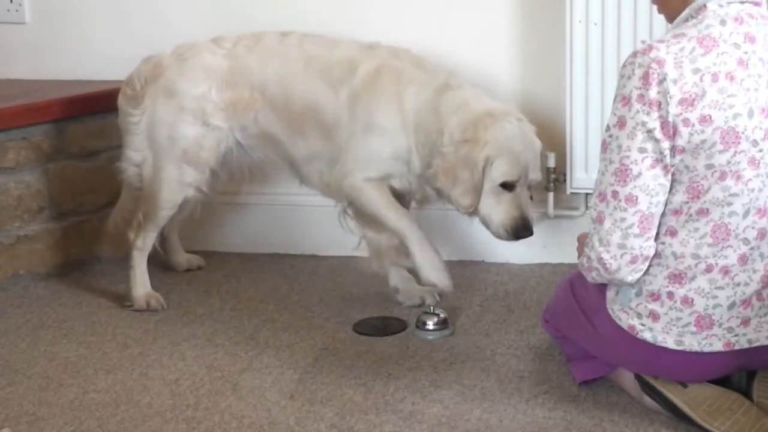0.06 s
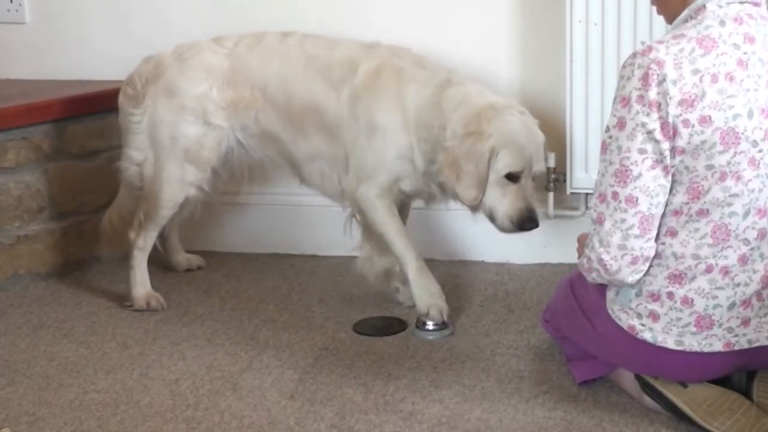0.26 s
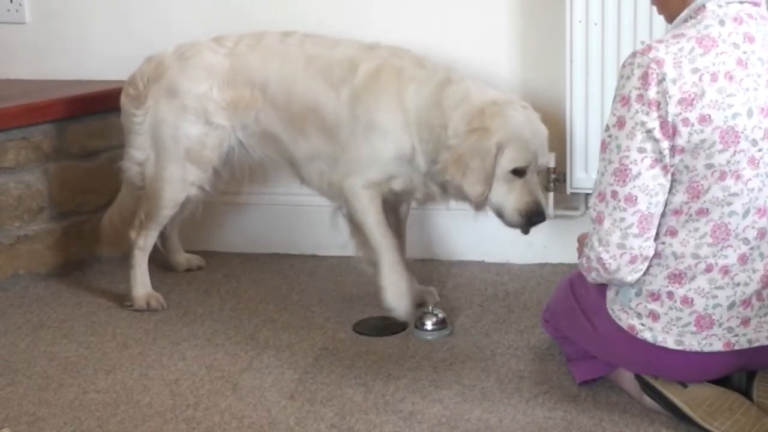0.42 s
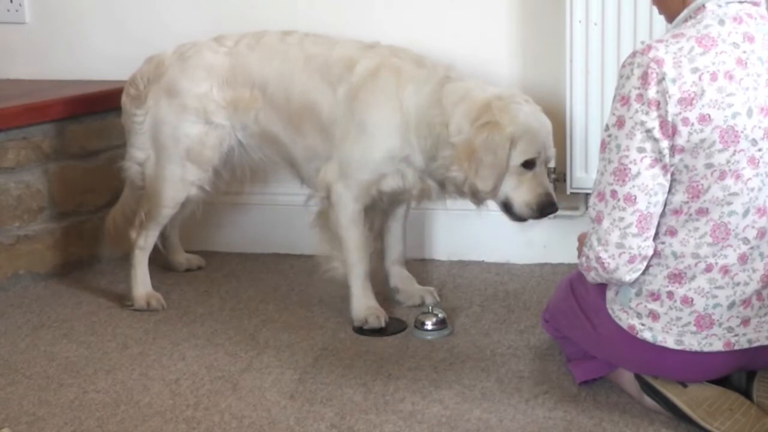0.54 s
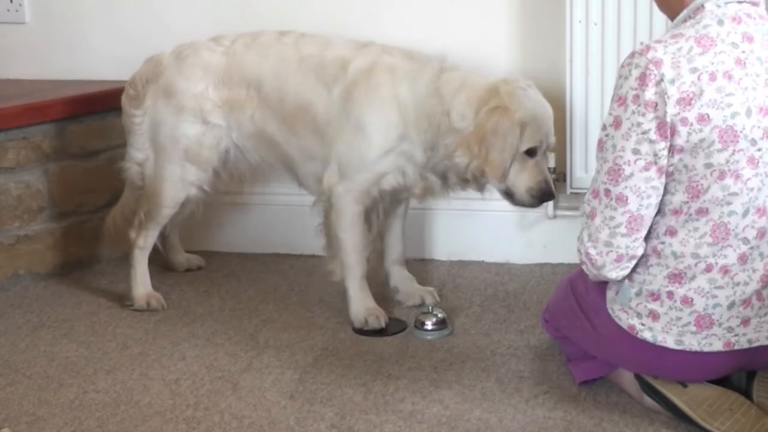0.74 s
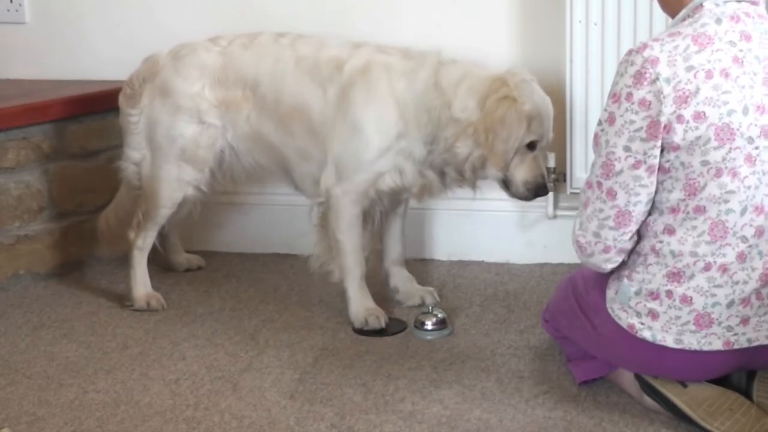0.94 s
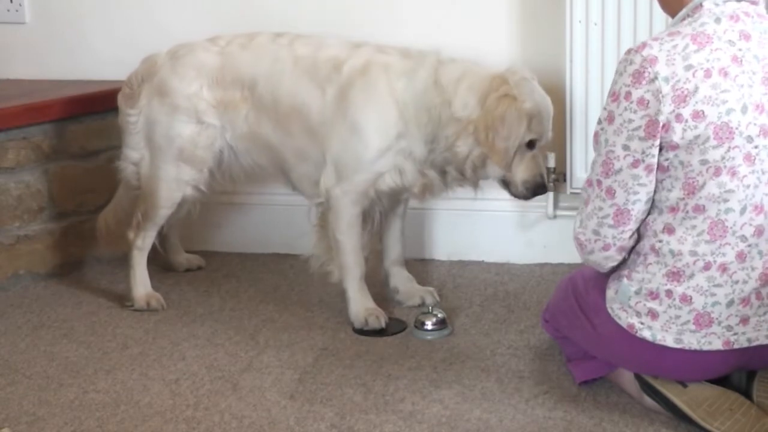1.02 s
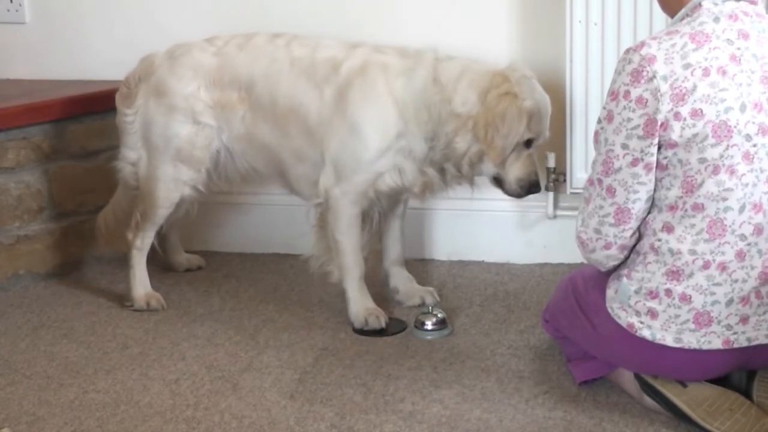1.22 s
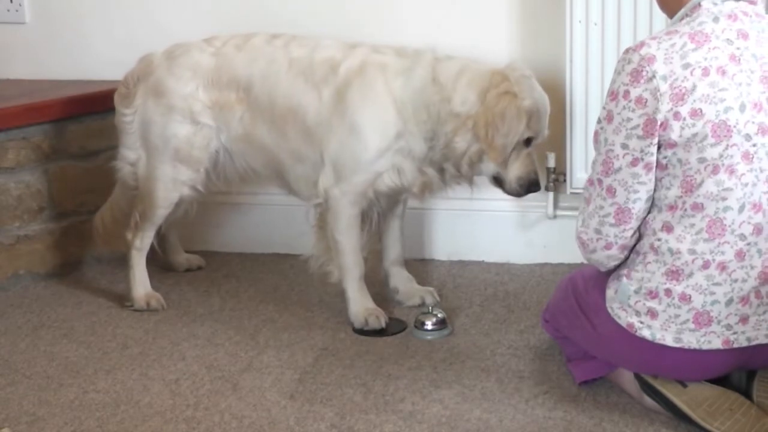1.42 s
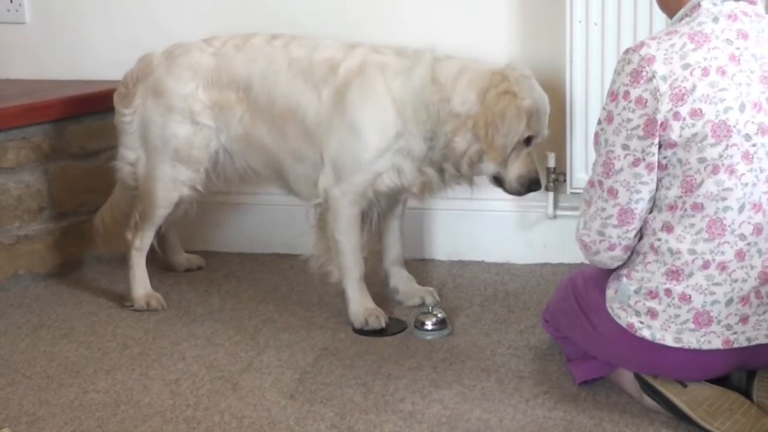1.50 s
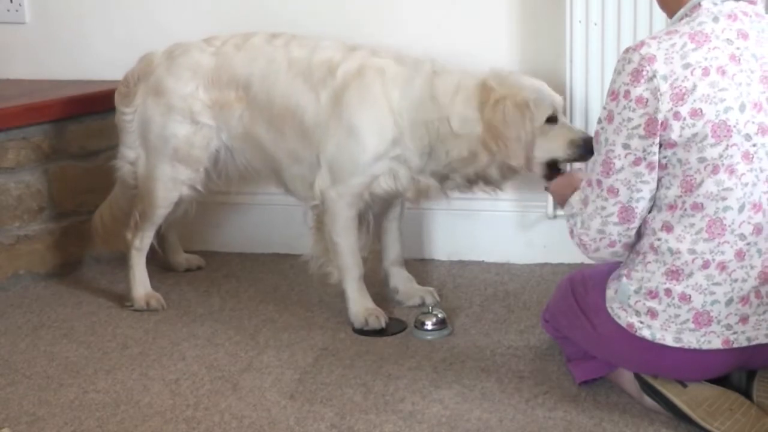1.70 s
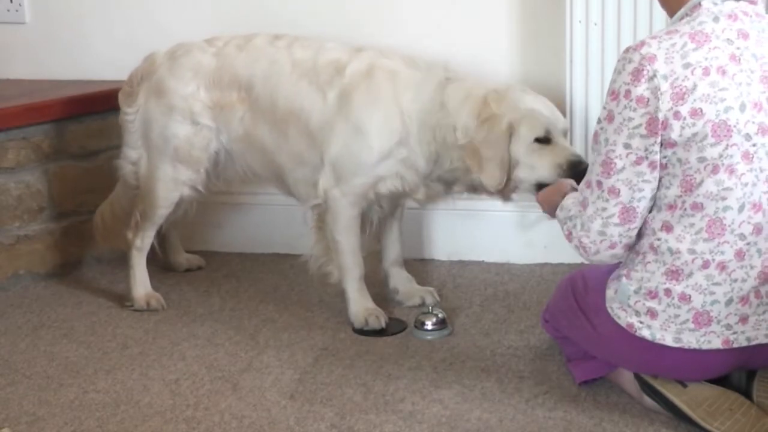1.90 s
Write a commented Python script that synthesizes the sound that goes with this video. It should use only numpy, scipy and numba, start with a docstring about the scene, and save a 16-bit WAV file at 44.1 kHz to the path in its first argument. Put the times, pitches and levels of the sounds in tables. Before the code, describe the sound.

A small desk bell dings once and rings on, with two sharp clicker snaps.

```python
"""A low hum fills a carpeted room, where a steel desk bell still sings faintly from an earlier strike.
A dog scuffs, whines and paws the plunger: a double knock, then the dome rings in beating pairs of modes.
A training clicker answers, its steel tongue snapping once when pressed and again when let go.
As the ring fades, the dog shifts its paws and whines twice more, very faintly.
Throughout, a limiter ducks the ring at the sharpest hits."""
import sys
import numpy as np
from scipy import signal
from scipy.fft import rfft, irfft
from scipy.io import wavfile
from scipy.ndimage import minimum_filter1d
from numba import njit

SR = 44100
rng = np.random.default_rng(int(sys.argv[2]) if len(sys.argv) > 2 else 0)


def log_audio(samples):
    """Write samples as a 16-bit WAV file to the path given in sys.argv[1]."""
    # one column per channel
    frames = np.atleast_2d(samples).T
    # limit to full scale, then quantise
    limited = np.clip(frames, -1, 1)
    pcm = np.round(limited * 32767).astype(np.int16)
    wavfile.write(sys.argv[1], SR, pcm)


N = 85995

# Room tone colour: frequency_hz, relative_db
AIR_COLOUR = [(25, 0.5), (45, -11), (70, 3.5), (110, -4.5), (150, -4), (300, -10.5), (600, -7.5),
              (1000, -11.5), (1800, -15), (2500, -29.5), (4500, -26.5), (7000, -28), (12000, -32),
              (16000, -37.5)]
# The dog's whines: start_s, length_s, start_pitch_hz, end_pitch_hz, level_db
DOG_WHINES = [(0.084, .16, 595, 535, -61), (0.94, .24, 649, 652, -64), (1.471, 0.24, 618, 541, -60)]
# Paws on carpet: centre_s, spread_s, centre_hz, width_hz, level_db
PAW_SCUFFS = [(0.051, 0.017, 704, 756, -56), (0.141, .006, 4250, 1577, -59), (0.932, .03, 1266, 250, -61.5),
              (0.933, 0.021, 490, 200, -59.5), (.935, .022, 6900, 7000, -62),
              (1.631, 0.019, 750, 1190, -60), (1.62, 0.017, 4220, 2200, -71),
              (1.778, 0.014, 3860, 1490, -64.5), (1.768, 0.01, 10600, 4000, -69)]
# Low body under each snap and knock: frequency_hz, relative_db
BODY_COLOUR = [(30, -11.5), (120, 12.5), (300, -23.5), (600, 9), (1300, -3.5), (3000, -39), (16000, -40.5)]
# Clicker press, then release: snap_s, level_db, build_s, t60_s, thud_db, pan_db
CLICKER_SNAPS = [(.4801, -12, .0019, .007, -17.5, -1), (.6913, -14.3, .0022, .007, -22, -1)]
# The steel tongue going down: frequency_hz, relative_db
PRESS_COLOUR = [(300, -24), (1100, -24), (1900, -7.5), (2700, -20.5), (4500, -7.5), (5700, -4.5),
                (7000, 5.5), (8500, -3), (10000, -12), (12000, -7.5), (13200, -24.5), (16000, -15.5)]
# The steel tongue springing back: frequency_hz, relative_db
RELEASE_COLOUR = [(300, -30), (1500, -29), (1830, -6), (2500, -19), (3700, -21), (4600, -1.5), (6800, 2.5),
                  (8200, -4.5), (9500, -1), (10300, -1), (11000, 4.5), (11600, -4), (12400, -2.5),
                  (13300, -15.5), (16000, -20)]
# Plunger and clapper hits: start_s, level_db, thud_db
BELL_KNOCKS = [(.2288, -18.5, -30), (.2315, -9.5, -19)]
# Metallic edge of those hits: frequency_hz, relative_db
METAL_COLOUR = [(300, -12), (900, -4), (1500, -3.5), (2400, -14.5), (3500, -5.5), (4500, -11), (7000, -11),
                (9000, -5), (9800, 3), (10600, -8.5), (11400, 5.5), (12300, -4), (13200, 5), (14200, -15.5),
                (16000, -11)]
# The dome's mode pairs: pitch_hz, relative_db, t60_s, pan_db, left_lead_s,
# twin_offset_hz, twin_relative_db, twin_pan_db, swell_s
DOME_MODES = [(900, -33.8, 8.2, 2.2, 7e-5, -9.95, -13, 1.4, 0),
              (2369.8, -36.8, 4.4, 3, 1e-5, -13.75, -9.5, -3, .19),
              (4369.6, -33, 4.3, -.4, 0, -4.8, -9.5, -2, .09),
              (6855.4, -23.2, 1.92, -.7, -9e-6, 15.3, -10, -7, .14), (8181, -27.5, .27, 0, 0, 6, -12, 0, 0),
              (9813, -19.5, .62, -8, 1.2e-5, 13, -14, 0, 0), (11402, -22, .23, -5, 1.5e-5, 50, -6, -3, 0),
              (13174, -20, .34, -2, 1.8e-5, 13, -6, 4, 0)]
# The dome's weak single overtones: pitch_hz, relative_db, t60_s
DOME_OVERTONES = [(1798, -61, 7), (3763, -47, .3)]

ROOM_T60_S, ROOM_GAP_S, ROOM_BUILD_S = .35, .0016, .003
AIR_DB, AIR_SIDE_DB, HUM_HZ, HUM_DB = -60, -5.5, 114, -62
CASE_DB, CASE_T60_S = -4.5, .098
EARLIER_STRIKE_S, STRIKE_S, BELL_DB = -3.5, .2314, .65
SWELL_START = .3  # share of full amplitude at which a swelling mode starts
DIP_HZ, DIP_WIDTH_HZ, DIP_DB, HIGH_CUT_HZ = 3147, 361, -12.5, 15900
LIMIT_DB, LIMIT_ATTACK_S, LIMIT_RELEASE_S = -8.8, .0004, .075


def undb(db):
    """Decibels to gain."""
    return 10 ** (np.asarray(db) / 20)


def since(start_s):
    """Seconds since a moment, negative before it."""
    return np.arange(N) / SR - start_s


def pan(db):
    """Left and right gains, db apart; positive leans left."""
    return undb(np.array([[db], [-db]]) / 2)


def fade(t, t60_s):
    """Hard attack, then a decay of 60 dB every t60_s."""
    return (t >= 0) * np.exp(-np.log(1000) * np.maximum(t, 0) / t60_s)


def noise(colour):
    """Unit-level noise shaped by a colour table."""
    hz, db = np.array(colour).T
    f = np.maximum(np.fft.rfftfreq(N, 1 / SR), 1)
    gain = undb(np.interp(np.log(f), np.log(hz), db))
    x = irfft(rfft(rng.standard_normal(N)) * gain, N)
    return x / x.std()


def in_room(x, wet_db):
    """A sound plus its diffuse reflections, different at each ear."""
    t = since(ROOM_GAP_S)[:SR // 2]
    build = 1 - np.exp(-np.maximum(t, 0) / ROOM_BUILD_S)
    tail = rng.standard_normal((2, len(t))) * fade(t, ROOM_T60_S) * build
    tail /= np.sqrt(np.sum(tail ** 2, axis=1, keepdims=True))
    return x + undb(wet_db) * signal.fftconvolve(np.atleast_2d(x), tail, axes=1)[:, :N]


def room_tone():
    """A wide bed of steady air with a wavering low hum."""
    rush = noise(AIR_COLOUR) + undb(AIR_SIDE_DB) * noise(AIR_COLOUR) * np.array([[1], [-1]])
    drift = np.interp(np.arange(N), np.linspace(0, N, 20), rng.standard_normal(20))
    hum = np.sin(2 * np.pi * np.cumsum(HUM_HZ * (1 + .016 * drift)) / SR)
    return pan(db=2) * (undb(AIR_DB) * rush + undb(HUM_DB) * hum)


def whines():
    """The dog's thin, pure tones sag in pitch or hold nearly level."""
    out = 0
    for start_s, length_s, start_hz, end_hz, db in DOG_WHINES:
        progress = np.clip(since(start_s) / length_s, 0, 1)
        arch = np.sqrt(4 * progress * (1 - progress))
        pitch_hz = start_hz + (end_hz - start_hz) * progress
        out = out + undb(db) * arch * np.sin(2 * np.pi * np.cumsum(pitch_hz) / SR)
    return in_room(out, wet_db=-5.5)


def paws():
    """Paws rub the carpet in brief, soft swells of band noise."""
    out, f = 0, np.fft.rfftfreq(N, 1 / SR)
    for centre_s, spread_s, hz, width_hz, db in PAW_SCUFFS:
        rub = irfft(rfft(rng.standard_normal(N)) / (1 + (2 * (f - hz) / width_hz) ** 2), N)
        swell = np.exp(-.5 * (since(centre_s) / spread_s) ** 2)
        out = out + undb(db) * rub / rub.std() * swell
    return in_room(out, wet_db=0)


def thud(start_s, db):
    """The dull push of a small body that is knocked."""
    push = fade(since(start_s), t60_s=.005) * noise(BODY_COLOUR)
    return undb(db) * in_room(push, wet_db=-10)


def clicker():
    """A steel tongue buckles over a few milliseconds and snaps through; its case rings briefly."""
    out = 0
    for row, colour in zip(CLICKER_SNAPS, (PRESS_COLOUR, RELEASE_COLOUR)):
        snap_s, db, build_s, t60_s, thud_db, pan_db = row
        t = since(snap_s)
        buckle = (t < 0) * np.exp(-.5 * (t / build_s) ** 2)
        case = undb(CASE_DB) * fade(t, CASE_T60_S)
        snap = in_room((buckle + fade(t, t60_s) + case) * noise(colour), wet_db=-2)
        out = out + pan(pan_db) * undb(db) * snap + thud(snap_s, thud_db)
    return out


def plunger():
    """The bell's attack: the plunger bottoms out and the clapper meets the dome."""
    out = 0
    for start_s, db, thud_db in BELL_KNOCKS:
        knock = in_room(fade(since(start_s), t60_s=.018) * noise(METAL_COLOUR), wet_db=-7)
        out = out + pan(db=-3) * undb(db) * knock + thud(start_s, thud_db)
    return out


def mode(t, hz, db, t60_s, lead_s=0):
    """One decaying vibration of the dome, reaching the left ear lead_s before the right."""
    ear_time = t + lead_s * np.array([[.5], [-.5]])
    return undb(db) * fade(t, t60_s) * np.sin(2 * np.pi * hz * ear_time)


def bell():
    """The dome is slightly out of round, so each main mode beats against a weaker twin."""
    ring = 0
    for t in since(EARLIER_STRIKE_S), since(STRIKE_S):
        for hz, db, t60_s, pan_db, lead_s, offset_hz, twin_db, twin_pan_db, swell_s in DOME_MODES:
            main = pan(pan_db) * mode(t, hz, db, t60_s, lead_s)
            twin = pan(twin_pan_db) * mode(t, hz + offset_hz, db + twin_db, t60_s)
            # The middle modes bloom after the hit.
            swell = 1 - (1 - SWELL_START) * np.exp(-np.maximum(t, 0) / swell_s) if swell_s else 1
            ring = ring + swell * (main + twin)
    overtones = sum(mode(since(STRIKE_S), hz, db, t60_s) for hz, db, t60_s in DOME_OVERTONES)
    return undb(BELL_DB) * in_room(ring + overtones, wet_db=-20)


def scene():
    """Bell and clicker up front, dog and room tone far beneath."""
    return bell() + plunger() + clicker() + paws() + whines() + room_tone()


def record(dry):
    """A narrow dip near 3 kHz softens the sound; a look-ahead limiter ducks peaks; the top is cut."""
    f = np.fft.rfftfreq(N, 1 / SR)
    dip = undb(DIP_DB * np.exp(-.5 * ((f - DIP_HZ) / DIP_WIDTH_HZ) ** 2))
    x = irfft(rfft(dry) * dip, N)
    threshold = float(undb(LIMIT_DB))
    peaks = -minimum_filter1d(-np.abs(x).max(axis=0), size=89)  # loudest within 1 ms either way
    level = follow_level(peaks, threshold)
    high_cut = signal.ellip(8, .2, 80, HIGH_CUT_HZ, fs=SR, output="sos")
    return signal.sosfilt(high_cut, x * threshold / level)


@njit
def follow_level(peaks, threshold):
    """The limiter's detector rises fast and sinks slowly back to the threshold."""
    attack = 1 - np.exp(-1 / (LIMIT_ATTACK_S * SR))
    release = 1 - np.exp(-1 / (LIMIT_RELEASE_S * SR))
    out, level = np.empty(len(peaks)), threshold
    for i in range(len(peaks)):
        target = max(peaks[i], threshold)
        level += (target - level) * (attack if target > level else release)
        out[i] = level
    return out


dry = scene()
out = record(dry)
log_audio(out)
```